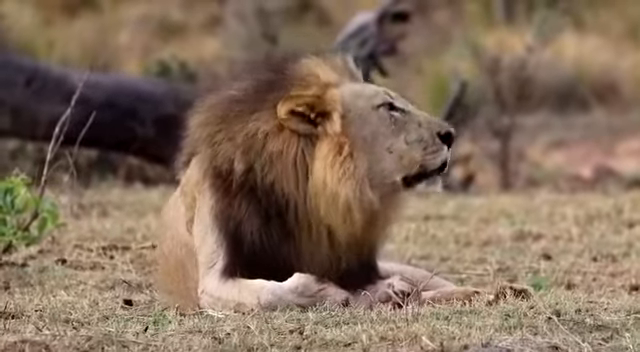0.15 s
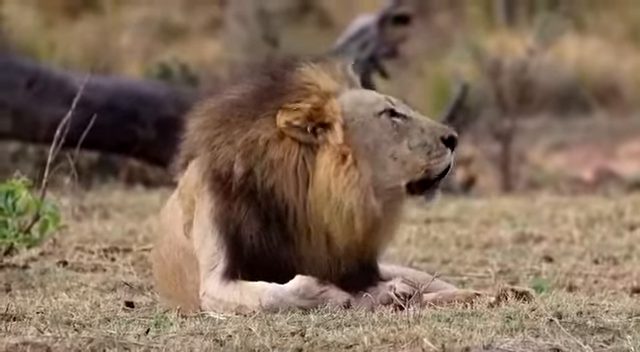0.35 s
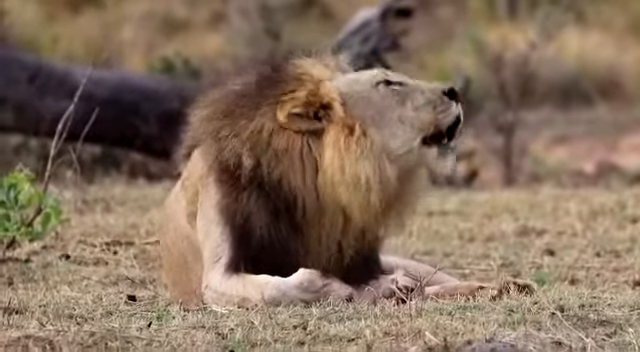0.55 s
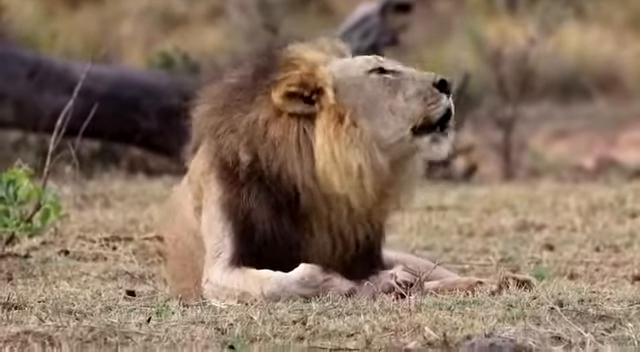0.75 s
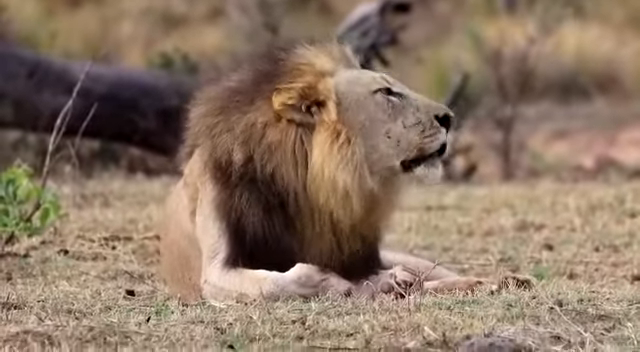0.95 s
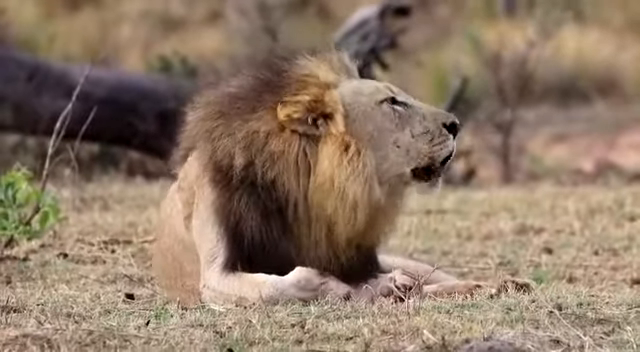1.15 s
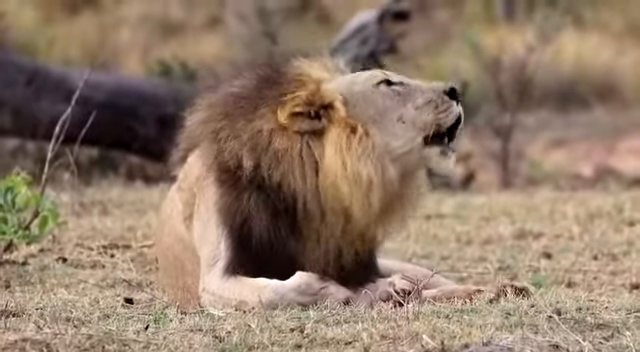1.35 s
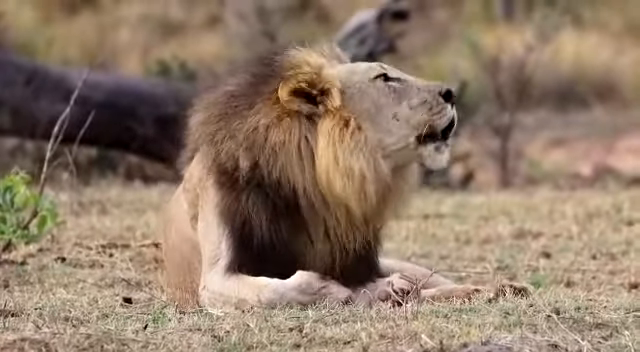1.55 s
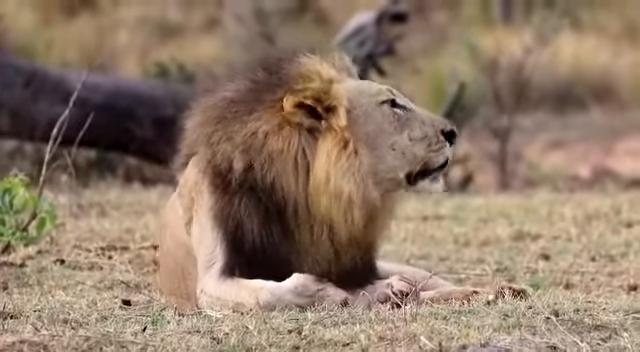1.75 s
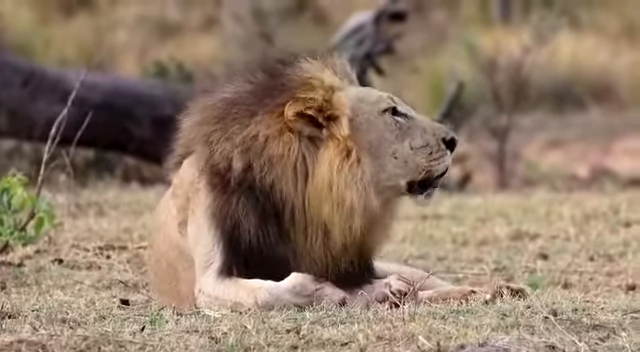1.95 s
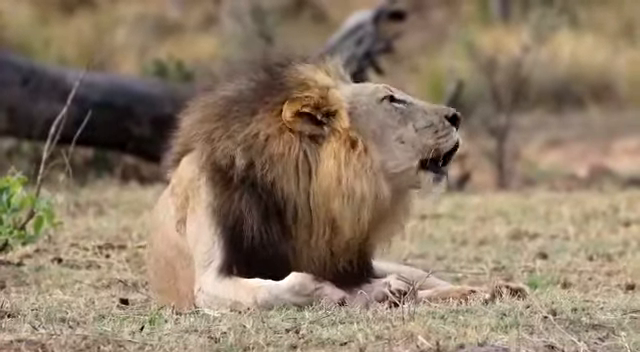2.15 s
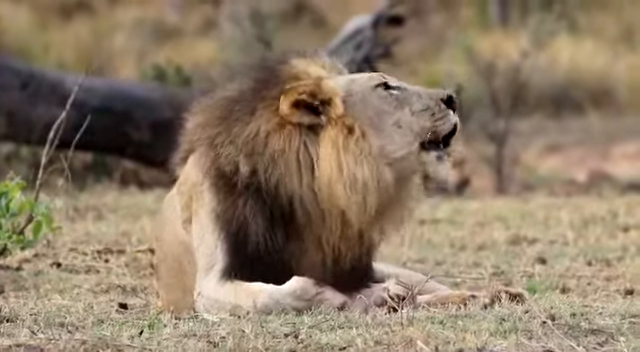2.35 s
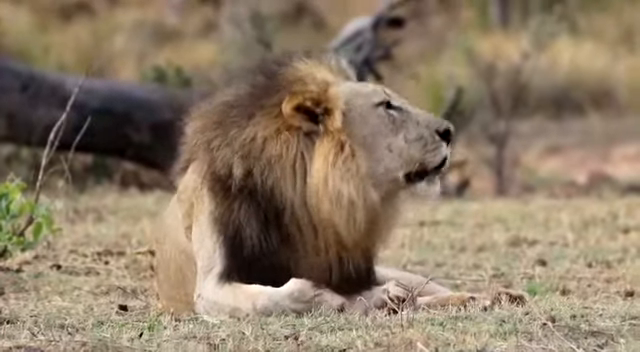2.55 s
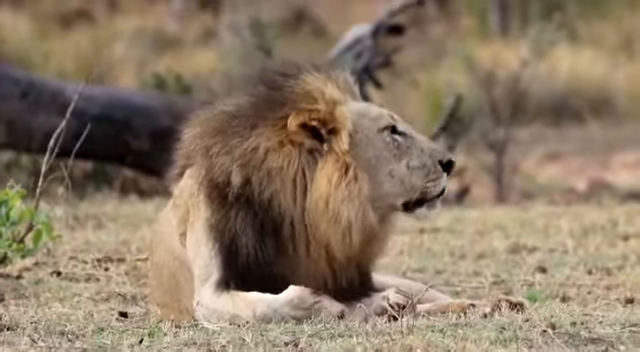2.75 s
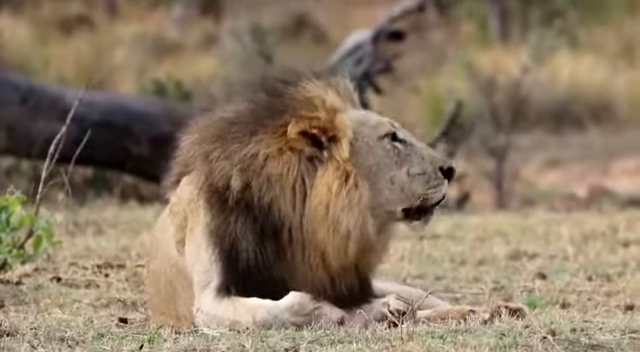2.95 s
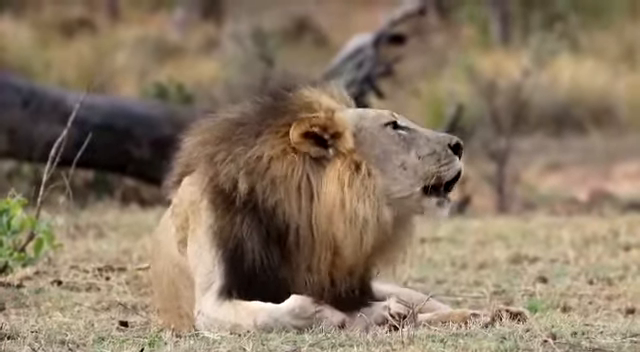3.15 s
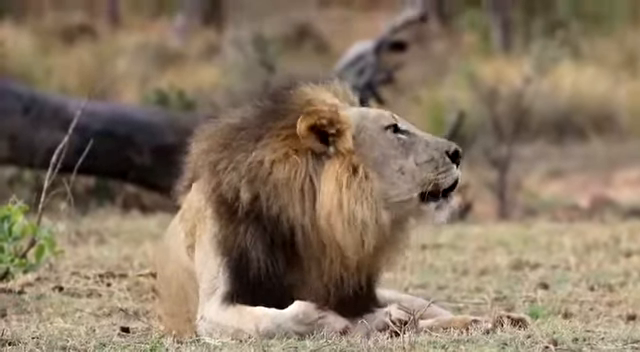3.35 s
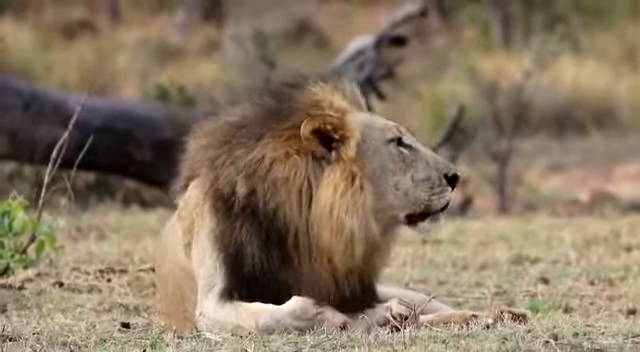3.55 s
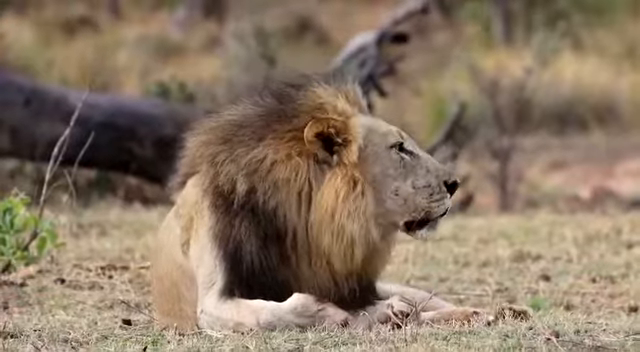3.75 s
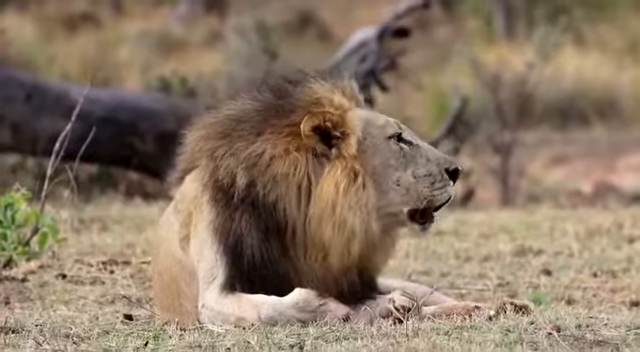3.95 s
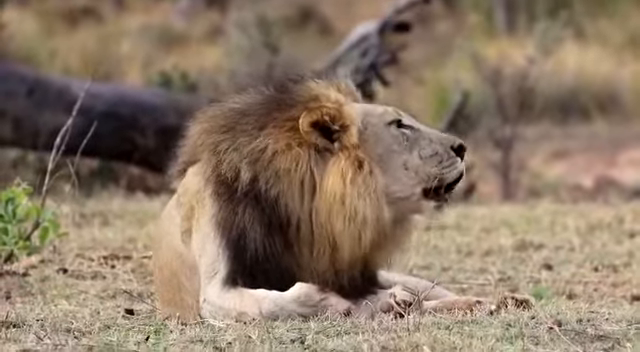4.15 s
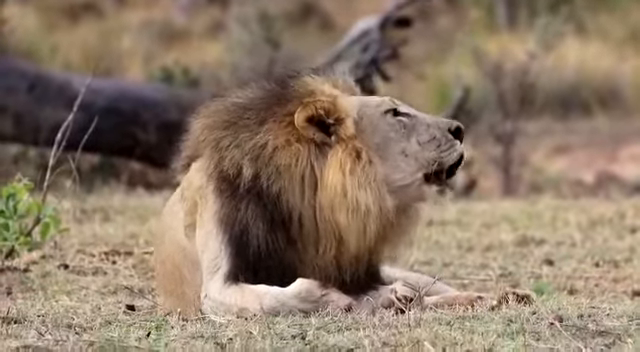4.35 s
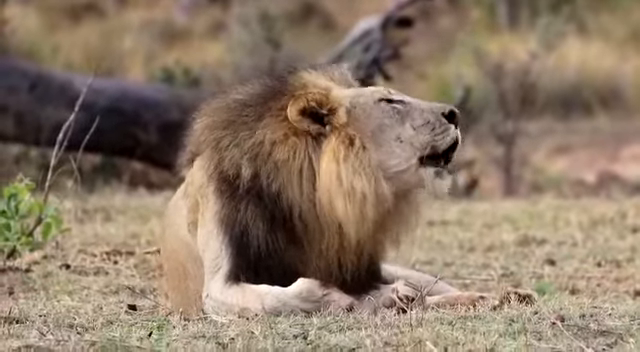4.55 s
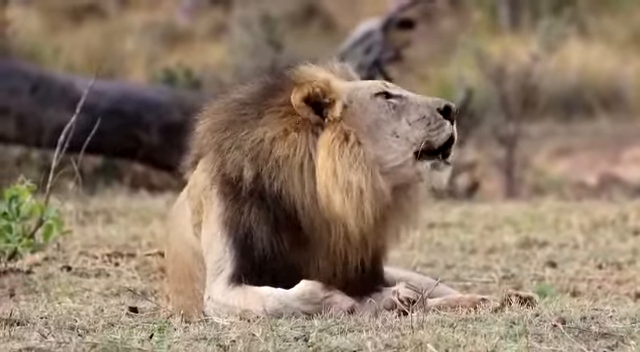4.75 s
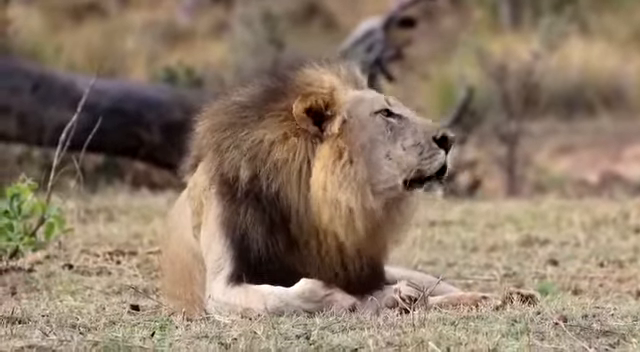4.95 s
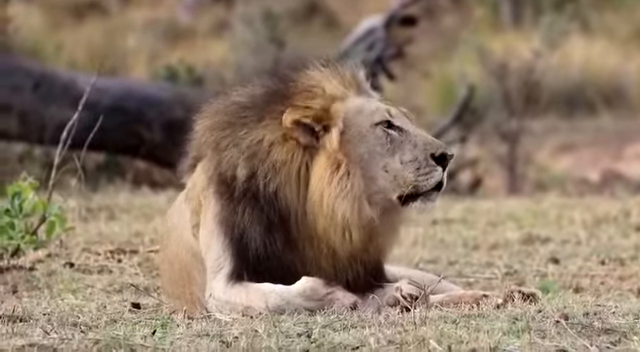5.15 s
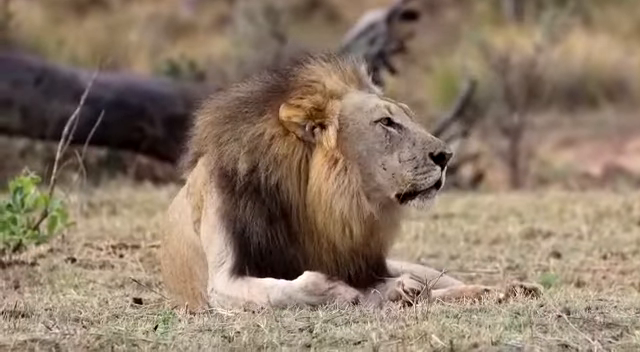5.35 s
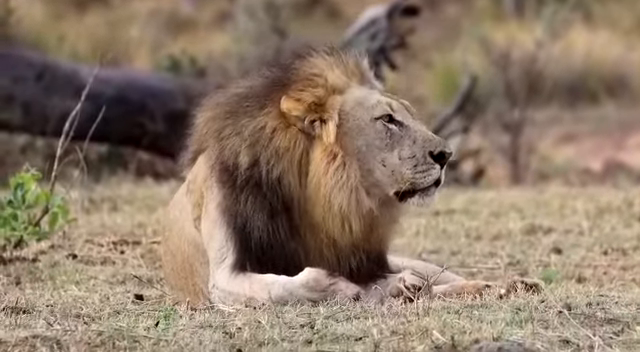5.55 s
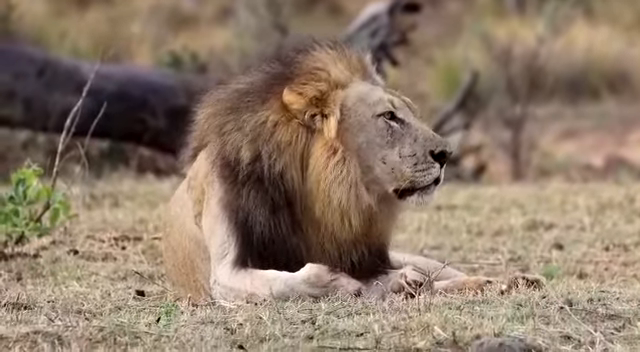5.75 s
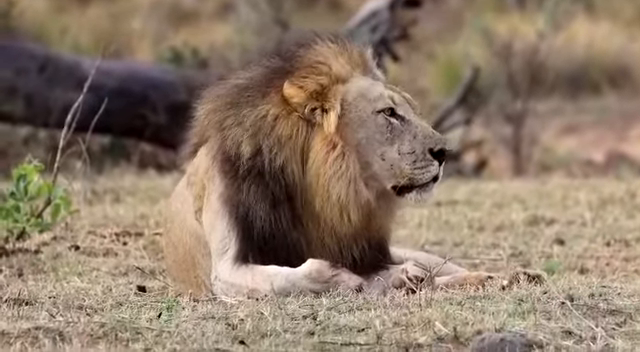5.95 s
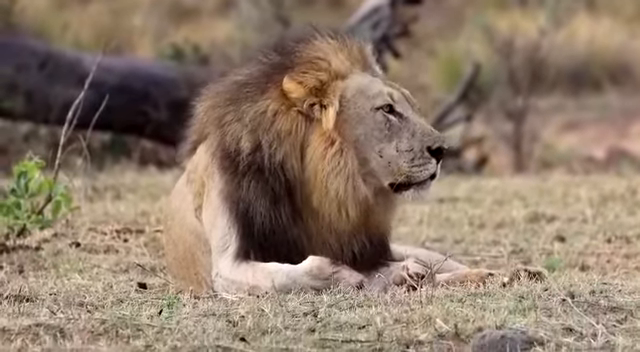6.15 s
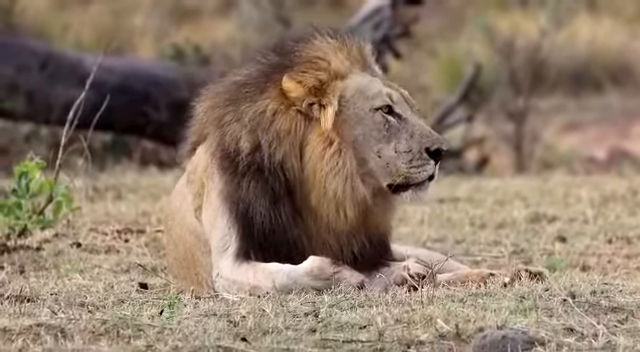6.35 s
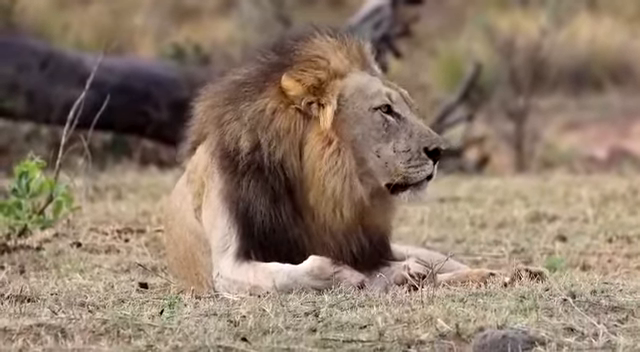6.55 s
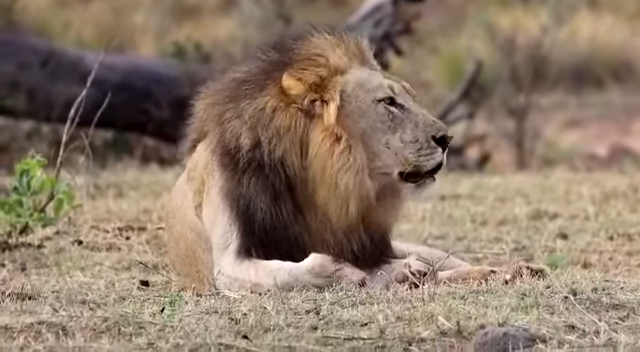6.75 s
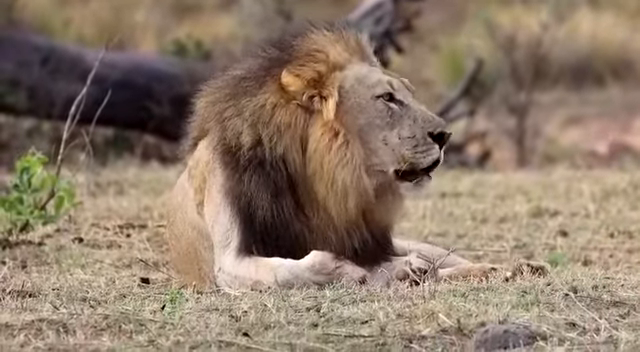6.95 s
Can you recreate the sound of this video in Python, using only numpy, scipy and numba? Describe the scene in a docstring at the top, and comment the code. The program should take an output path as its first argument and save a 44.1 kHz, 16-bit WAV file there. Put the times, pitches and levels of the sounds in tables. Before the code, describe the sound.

A lion's low chest grunts dominate, each a brief burst of booming throat tone with raspy breath, softening from the clear opening one to a chaotic, weak fifth and a stronger sixth. Quiet stereo bush murmur lies underneath. Short nasal squawks recur throughout, quick high chirps cluster in the middle, mostly leaning left, and distant doves coo dimly. The ending is calm: sparse whistles, squawks and tiny dry snaps, with natural open-air echo.

```python
"""Open bush: a lion gives six deep grunts, songbirds whistle, one bird squawks again and again, doves coo far off.
Lion: a sine chest tone, folds ringing throat resonances, and noise breath through the mouth; trees return a low echo.
Birds: whistles and coos are gliding near sines, squawks are clicks through resonances, the dove hum is narrow noise.
Ticks are short noise bursts; the bush murmur is stereo noise shaped in bands."""
import sys
import numpy as np
from scipy import signal
from scipy.io import wavfile
from scipy.ndimage import uniform_filter1d
from numba import njit

SR = 44100
rng = np.random.default_rng(int(sys.argv[2]) if len(sys.argv) > 2 else 0)


def store_wav(level_fs):
    """Save 16-bit WAV to argv[1]."""
    pcm = np.round(np.clip(np.atleast_2d(level_fs), -1, 1) * 32767)
    wavfile.write(sys.argv[1], SR, pcm.T.astype(np.int16))


N = 308259
LEFT_RIGHT = np.array([[1], [-1]])   # signs of a side signal


def from_db(db):
    """Decibels to gain."""
    return 10 ** (np.asarray(db) / 20)


def rms_one(x):
    """Scale to rms 1."""
    return x / np.sqrt(np.mean(x ** 2) + 1e-20)


def in_time(tables):
    """Gate open during the calls, then the columns of all calls, on the sample clock."""
    t_s, *columns = np.transpose(np.concatenate(tables))
    t = np.arange(N) / SR
    is_open = sum((t >= rows[0][0]) & (t < rows[-1][0]) for rows in tables)
    gate = uniform_filter1d(is_open * 1., size=300, mode="nearest")
    return [gate] + [np.interp(t, t_s, column) for column in columns]


def at_hz(points, hz):
    """Read a spectrum table on a log frequency axis."""
    table_hz, values = np.array(points).T
    return np.interp(np.log(hz), np.log(table_hz), values)


def drift(rate):
    """Slow random signal of spread 1; a higher rate moves faster."""
    step = 40   # computed on every 40th sample
    r = np.exp(-2 * np.pi * step * rate / SR)
    settle = 2000
    noise = rng.standard_normal(N // step + settle + 2)
    slow = rms_one(signal.lfilter([1], [1, -2 * r, r * r], noise)[settle:])
    return np.interp(np.arange(N) / step, np.arange(len(slow)), slow)


@njit
def resonate(x, hz, width, rate):
    """Two-pole resonance whose centre may move; gain 1 on top."""
    out = np.zeros(len(x))
    r = np.exp(-np.pi * width / rate)
    for i in range(2, len(x)):
        drive = (1 - r * r) / 2 * (x[i] - x[i - 2])
        turn = 2 * r * np.cos(2 * np.pi * hz[i] / rate)
        out[i] = drive + turn * out[i - 1] - r * r * out[i - 2]
    return out


def modes(x, table, bend=1):
    """Parallel resonances (f/Hz, width/Hz, level/dB), signs alternating; bend scales every f."""
    return sum((-1) ** k * from_db(db) * resonate(x, hz * bend * np.ones(N), width * 1., SR)
               for k, (hz, width, db) in enumerate(table))


def evened(x, span_s):
    """Hold the level near 1 over span_s, so that an envelope can be laid on."""
    power = uniform_filter1d(x ** 2, size=int(span_s * SR))
    return x / np.sqrt(power + 1e-12)


def pulses(cycles, spread_db):
    """One click per cycle, of uneven strength."""
    starts = np.diff(np.floor(cycles), prepend=0) > 0
    return starts * from_db(spread_db * rng.standard_normal(N)) + 1e-18


def pan(x, lean_db):
    """Set left minus right level; positive leans left."""
    return x * from_db(lean_db / 2 * LEFT_RIGHT)


def trees(x, t60_s, rise_s, cut_hz):
    """Scattered reflections: a dying, low-passed noise response, partly common to both sides."""
    t = np.arange(int(t60_s * SR)) / SR
    common, own = rng.standard_normal((2, 2 * SR))[:, :len(t)]
    shape = rms_one(from_db(-60 * t / t60_s) * np.clip(t / rise_s, 0, 1))
    scatter = shape * (common + .5 * own * LEFT_RIGHT)
    response = signal.lfilter(*signal.butter(1, cut_hz, fs=SR), scatter)
    return signal.fftconvolve(x[None], response / np.sqrt(len(t)), axes=1)[:, :N]


def mouth_noise(puffs, jaw):
    """Puffed noise through the mouth resonances, in three groups that flicker independently; rms 1."""
    # breath resonances: f/Hz, width/Hz, level/dB
    mouth = [(677, 140, -9), (909, 74, -1), (1280, 160, -2), (2077, 138, 2), (2806, 220, -6),
             (3230, 71, -1.5), (3975, 155, -1.5), (5050, 680, -7.5), (6210, 87, -21), (7020, 140, -14.5),
             (12850, 1000, -29.5)]
    total = 0
    for k in range(3):
        flicker = from_db(4.97 * drift(9.8))
        total = total + flicker * modes(puffs * rng.standard_normal(N), mouth[k::3], jaw)
    return rms_one(total)


def lion():
    """Vocal folds drive a chest tone and throat rings; breath rasps through the mouth in uneven puffs."""
    # one curve per grunt: t/s, chest level/dB, pitch f/Hz, throat ring level/dB, throat f/Hz, breath level/dB
    grunts = [
        [(0.0, -7, 131.1, -5, 370, -19), (0.016, -13, 128, -21, 363, -31),
         (0.038, -12.5, 117.2, -25.5, 363, -35.5), (0.074, -30, 113.8, -37.5, 338, -43.5),
         (0.096, -25, 124, -27.5, 325, -37.5), (0.134, -29, 127.6, -38, 336, -41),
         (0.158, -30, 127.3, -65, 354, -62), (0.25, -44.5, 121, -67, 348, -65)],
        [(0.7, -47, 114.2, -71, 313.6, -76), (0.762, -26, 116.3, -36.5, 335.4, -43.5),
         (0.804, -25, 117.1, -37.5, 355, -44), (0.824, -19, 117, -19.5, 354, -36),
         (0.848, -9.5, 117.9, -17, 380, -29), (0.872, -14, 115.5, -26, 353.7, -38.5),
         (0.908, -31.5, 115, -44, 345, -45.5), (0.93, -40, 113.4, -32.5, 320, -41.5),
         (0.972, -33.5, 109, -40, 332, -53), (1.05, -72, 111.9, -67, 336, -66)],
        [(1.5, -59, 111.5, -79, 333.5, -74), (1.536, -41, 112, -51, 335.9, -64),
         (1.554, -29.5, 111.5, -45, 350, -50), (1.61, -24.5, 111, -34, 349, -43),
         (1.636, -17.5, 111.7, -21, 336, -34), (1.66, -14.5, 112.5, -25.5, 345.6, -35.5),
         (1.702, -34.5, 111.5, -36, 360, -49.5), (1.756, -35, 111.2, -51, 343, -48.5),
         (1.774, -31, 110.5, -49, 337, -51), (1.85, -54, 111.4, -66, 334, -92)],
        [(2.37, -57.5, 114.7, -73, 326, -68), (2.404, -42, 115.8, -55, 351.8, -70.5),
         (2.456, -28, 114.4, -31.5, 357, -44), (2.486, -19.5, 115.1, -33, 356, -42),
         (2.522, -20.5, 110.6, -32, 360, -38), (2.558, -19.5, 110.1, -21.5, 332.5, -36.5),
         (2.582, -25, 107.8, -34, 322, -39), (2.632, -50, 109, -39.5, 337, -53),
         (2.668, -39, 110, -46.5, 310, -55), (2.75, -44, 110, -59, 331, -65)],
        [(3.32, -47, 114.8, -63, 336, -67), (3.344, -44, 109.5, -47, 338, -70),
         (3.37, -29, 104.5, -46, 347, -53.5), (3.392, -28, 104.6, -33, 344, -52),
         (3.432, -43, 104.5, -38, 328, -59), (3.46, -24, 104.5, -26.5, 338, -38),
         (3.526, -38, 122, -43, 340, -54.5), (3.57, -46, 111.5, -53, 320, -56),
         (3.602, -42.5, 114.1, -51, 345, -56), (3.65, -64, 119.4, -68, 345, -64)],
        [(4.62, -81, 116, -97, 319, -57), (4.648, -40, 116, -52, 348, -58),
         (4.712, -32, 103.7, -34.5, 347.5, -45.5), (4.74, -28.5, 104.6, -29.5, 331.4, -43),
         (4.77, -17.5, 111.8, -24, 339.2, -36.5), (4.802, -17.5, 112.6, -32.5, 334, -46),
         (4.848, -19.5, 112, -19.5, 334.8, -35), (4.986, -36.5, 112.2, -37.5, 331, -46),
         (5.052, -41, 117, -45, 319.5, -58.5), (5.1, -52, 119.4, -52, 320, -50)],
    ]
    # per grunt at full effort: roughness, 0 clear to 1 chaotic
    roughness = [.1, .12, .35, .55, .9, .65]
    # weaker throat resonances: f/Hz, width/Hz, level/dB
    throat_fill = [(190, 22.3, 7), (256, 97, -4.5), (445.5, 110, -8), (507, 19.5, -5)]
    # hard rasps in the breath: t/s, approximate peak level/dB
    rasps = [(0.0923, -22), (0.7546, -32), (0.829, -45), (0.8667, -10), (0.938, -41), (0.9524, -39),
             (1.5535, -39), (1.6123, -35), (1.652, -16), (1.76, -34), (2.492, -28), (2.5115, -26),
             (2.5514, -38), (2.5746, -30), (2.6194, -37), (3.4544, -19.5), (3.4891, -42), (4.7158, -40),
             (4.7535, -18.5), (4.769, -16.5), (4.7844, -42.5), (4.8322, -19), (4.8528, -27), (4.8868, -21),
             (4.9083, -12), (4.9325, -29.5), (4.9863, -19)]

    gate, chest_db, pitch_hz, ring_db, throat_hz, breath_db = in_time(grunts)
    starts_s = [rows[0][0] for rows in grunts]
    grunt = np.searchsorted(starts_s, np.arange(N) / SR, side="right") - 1
    # the folds only lock into a steady beat at full effort
    slackness = np.clip(-17 - chest_db, 0, 99) / 14
    rough = np.clip(np.array(roughness)[grunt] + slackness, 0, 1)

    cycles = np.cumsum(pitch_hz * (1 + .05 * rough * drift(30))) / SR
    chest_gain = from_db(chest_db + 5.0 * rough * drift(46.0))
    chest = np.sqrt(2) * np.sin(2 * np.pi * cycles) * chest_gain
    # the body radiates no deeper
    chest = signal.sosfilt(signal.butter(2, 85, "high", fs=SR, output="sos"), chest)

    # slack tissue flaps at its own slow, uneven rate
    flap_hz = 45
    flap_cycles = np.cumsum(flap_hz * from_db(4 * drift(30.64))) / SR
    flaps = pulses(flap_cycles, 3.0) * np.sqrt(SR / flap_hz)
    steady = pulses(cycles, 4.2) * np.sqrt(SR / pitch_hz)
    chaotic = .8 * flaps + .7 * rng.standard_normal(N)
    folds = (1 - rough) * steady + rough * chaotic

    ring = resonate(folds, throat_hz, 60.6, SR)
    ring = evened(resonate(ring, throat_hz, 99.0, SR), 0.03)
    # dark below and above the throat
    band = signal.butter(2, [150, 600], "band", fs=SR, output="sos")
    fill = signal.sosfilt(band, modes(folds, throat_fill, 1 + 0.062 * drift(12.6)))
    throat = from_db(ring_db) * (ring + from_db(-4.5) * evened(fill, 0.24))
    voice = gate * (chest + throat)
    # the throat beams a little to the right; shifts in samples
    chest_side = .02 * chest + .05 * np.roll(chest, shift=95)
    throat_side = -.08 * throat + .08 * np.roll(throat, shift=30)
    voice_side = gate * (chest_side + throat_side)

    puff_decay = np.exp(-1 / (.006 * SR))
    puffs = .5 + .35 * rms_one(signal.lfilter([1], [1, -puff_decay], flaps))
    jaw = 1 + .03 * drift(6)   # the mouth never holds still
    mid = mouth_noise(puffs, jaw)
    side = mouth_noise(puffs, jaw)
    breath = gate * from_db(breath_db) * (.88 * mid + .45 * side * LEFT_RIGHT)

    # a rasp is a sharp-fronted gust through the same mouth
    kicks = np.zeros(N)
    kicks[[int(s * SR) for s, _ in rasps]] = from_db(np.array(rasps)[:, 1])
    gust_decay = np.exp(-1 / (0.013 * SR))
    gusts = signal.lfilter([1], [1, -gust_decay], kicks + 1e-18)
    # low factors: noise peaks far above its rms
    breath = breath + gusts * (0.11 * mid + .05 * side * LEFT_RIGHT)

    voice_echo = from_db(-20) * trees(voice, t60_s=1.9, rise_s=.08, cut_hz=260)
    breath_echo = from_db(-4.5) * trees(breath[0], t60_s=0.39, rise_s=.02, cut_hz=1600)
    return voice + voice_side * LEFT_RIGHT + pan(breath, -1.4) + voice_echo + breath_echo


def air():
    """Far bush murmur: 0.4-octave bands of stereo noise, each flickering a little."""
    # murmur spectrum: f/Hz, relative level/dB per Hz
    spectrum = [(24, -44), (40, -7), (123, 5), (260, -6.5), (522, -5), (577, -6.5), (621, -12), (722, -7),
                (973, -7), (1380, -8), (2010, -5.5), (3220, -12.5), (12100, -27.5), (14000, -26.5),
                (15500, -51)]
    # left-right likeness: f/Hz, correlation
    likeness = [(60, 0.79), (130, 0.97), (500, 0.38), (1400, -0.18), (3100, -0.34), (15000, 0.063)]
    level_db = -52.5
    out = 0
    together = drift(1.5)
    edges_hz = 35 * 2 ** np.arange(0, 9, .4)
    white = rng.standard_normal((2, 2, N))   # two mid-side pairs, used by alternate bands
    for k, (low, high) in enumerate(zip(edges_hz, edges_hz[1:])):
        band = signal.butter(2, [low, high], "band", fs=SR, output="sos")
        mid, side = signal.sosfilt(band, white[k % 2])
        centre_hz = np.sqrt(low * high)
        alike = np.clip(at_hz(likeness, centre_hz), -1, 1)
        gain = from_db(at_hz(spectrum, centre_hz) + .7 * together + 1.2 * drift(4))
        out = out + gain * (np.sqrt(1 + alike) * mid + np.sqrt(1 - alike) * side * LEFT_RIGHT)
    return pan(from_db(level_db) * rms_one(out), -1.6)


def far_doves():
    """A distant chorus melts into a narrow throbbing hum: noise through two resonances."""
    hum = modes(rng.standard_normal(N), [(644, 15, 0)])
    hum = modes(hum, [(610, 51, 0)])
    return pan(rms_one(hum) * from_db(-68 + 4.7 * drift(4)), -0.82)


def ticks():
    """Short dry snaps in the grass: decaying noise bursts, band-passed around the ring pitch."""
    # ticks: t/s, peak level/dB, ring f/Hz, left minus right level/dB
    snaps = [(.418, -38.5, 4842, 1), (1.202, -49, 10160, -1), (2.249, -51, 7900, -27),
             (5.511, -43, 9530, -13), (5.53, -45, 9370, 3), (5.826, -36.5, 682, -1),
             (6.204, -41.5, 8500, -12), (6.217, -40.5, 6370, -7), (6.451, -40, 2170, -9),
             (6.93, -53, 9200, 3)]
    length = 800   # samples
    out = np.zeros((2, N))
    t = np.arange(length) / SR
    for (start_s, peak_db, hz, lean_db), noise in zip(snaps, rng.standard_normal((len(snaps), length))):
        edges_hz = [hz * .7, min(hz * 1.45, .45 * SR)]
        burst = noise * np.exp(-t / (0.0012 + 2.5 / hz))
        snap = signal.sosfilt(signal.butter(2, edges_hz, "band", fs=SR, output="sos"), burst)
        at = int(start_s * SR)
        out[:, at:at + length] += pan(from_db(peak_db) * snap / np.abs(snap).max(), lean_db)
    return out


def squawker():
    """Uneven clicks at about 200 a second ring a falling resonance and fixed ones around it."""
    # squawks: start t/s, mid t/s, end t/s, onset level/dB, mid level/dB,
    # main resonance f/Hz at the start, share it sags linearly, hiss level/dB over the call
    squawks = [(.488, .542, .61, -53, -39.5, 1930, .12, -18), (1.157, 1.19, 1.25, -44, -38, 1900, .3, -30),
               (1.872, 1.94, 1.99, -43, -46, 2000, .3, -8),
               (2.118, 2.163, 2.24, -53, -37.5, 2020, .14, -28),
               (3.745, 3.81, 3.86, -48, -41, 2000, .12, -18), (4.232, 4.28, 4.34, -45, -43, 2020, .32, -10),
               (4.474, 4.484, 4.55, -40, -35, 1750, .22, -18),
               (5.432, 5.465, 5.53, -42, -37, 1800, .12, -30),
               (6.057, 6.103, 6.16, -46, -36, 1950, .1, -28),
               (6.312, 6.362, 6.425, -51, -35, 2120, .13, -8)]
    end_db = -26   # end relative to mid
    calls = []
    for s0, s1, s2, onset_db, db, hz, sag, hiss in squawks:
        mid_hz = hz * (1 - sag * (s1 - s0) / (s2 - s0))
        calls.append([(s0, onset_db, hz, hiss), (s1, db, mid_hz, hiss),
                      (s2, db + end_db, hz * (1 - sag), hiss)])
    gate, level_db, centre_hz, hiss_db = in_time(calls)
    ends_s = np.array([(rows[0][0], rows[-1][0]) for rows in calls])
    progress = np.interp(np.arange(N) / SR, ends_s.ravel(), np.tile([0, 1], len(ends_s)))
    centre_hz = centre_hz * (1 - .33 * progress ** 3.5)   # the beak closes towards the end

    cycles = np.cumsum(200 * (1 + .18 * drift(60))) / SR
    clicks = pulses(cycles, 3) + .025 * rng.standard_normal(N)
    main = resonate(resonate(clicks, centre_hz, 150., SR), centre_hz, 700., SR)
    body = main + modes(clicks, [(1200, 450, -12), (2780, 200, -13)])
    # the clicks are soft
    body = signal.sosfilt(signal.butter(5, 3300, fs=SR, output="sos"), body)
    hiss_source = clicks + 0.52 * rng.standard_normal(N)
    hiss = modes(hiss_source, [(3680, 510, 7.5), (5719, 1835, -3.0), (6500, 640, 1.0)])
    hiss = signal.sosfilt(signal.butter(4, [3000, 8000], "band", fs=SR, output="sos"), hiss)
    mix = evened(body, 0.028) + from_db(hiss_db) * evened(hiss, 0.0074)
    call = gate * from_db(level_db) * mix
    return pan(call, -1.5) + from_db(-10) * trees(call, t60_s=.3, rise_s=.008, cut_hz=4000)


def bird_notes():
    """Every tonal note as left minus right level/dB and a glide of (t/s, f/Hz, level/dB)."""
    # dove coos: start t/s, length t/s, pitch f/Hz, peak level/dB
    coos = [(1.161, 0.19, 573, -60.5), (1.927, 0.16, 564, -58), (2.247, 0.11, 544, -58.5),
            (2.785, 0.11, 543, -60.5), (3.052, 0.074, 539, -61), (3.22, 0.19, 559, -63),
            (6.492, 0.057, 603, -51.5)]
    # thin falling peeps of one far bird: start t/s, level/dB
    peeps = [(2.699, -67), (2.932, -79), (3.775, -73), (3.849, -65.5), (5.135, -75), (5.43, -70),
             (5.575, -74), (5.8, -70.5), (6.019, -68.5)]
    # whistles, loudest where the glide bends: start t/s, bend t/s, end t/s,
    # start f/Hz, bend f/Hz, end f/Hz, peak level/dB, left minus right level/dB
    whistles = [ (1.005, 1.033, 1.05, 2940, 2790, 2770, -58, -9.5),
                (1.165, 1.239, 1.29, 2533, 2325, 1760, -50.5, -20),
                (2.67, 2.675, 2.685, 3660, 5100, 5330, -56, -11),
                (2.683, 2.687, 2.697, 3950, 4300, 5100, -55, -3),
                (2.69, 2.705, 2.74, 3880, 5160, 6210, -59.5, -1),
                (2.745, 2.754, 2.77, 6980, 8100, 9600, -66, -18),
                (2.746, 2.765, 2.79, 3400, 4800, 5270, -52.5, -6),
                (2.89, 2.926, 2.97, 2860, 3030, 2926, -52.5, -1),
                (2.997, 3.115, 3.12, 4260, 3800, 3540, -64.5, 4),
                (3.199, 3.217, 3.22, 2500, 4110, 4780, -53, 6),
                (3.214, 3.221, 3.225, 3140, 4270, 4630, -56.5, 4),
                (3.225, 3.235, 3.245, 5060, 3800, 3150, -59, -13.5),
                (3.421, 3.466, 3.475, 6830, 8140, 8650, -49.5, -8),
                (3.623, 3.64, 3.68, 3830, 5400, 3730, -48.5, -4),
                (3.631, 3.643, 3.68, 3460, 4570, 2760, -60, -31),
                (3.604, 3.65, 3.66, 6150, 9550, 6460, -69.5, -24),
                (3.679, 3.68, 3.7, 5330, 5760, 7060, -60.5, -12),
                (3.873, 3.879, 3.96, 3860, 3780, 3330, -64, -2),
                (4.112, 4.123, 4.145, 3460, 5070, 6270, -53.5, 6),
                (4.118, 4.132, 4.145, 6140, 6800, 8150, -62.5, -12),
                (4.126, 4.166, 4.18, 3330, 5320, 6580, -49.5, -6),
                (4.191, 4.202, 4.212, 7660, 3910, 6270, -45.5, -10),
                (4.286, 4.293, 4.293, 3020, 4700, 5400, -47, -12),
                (4.363, 4.37, 4.385, 3140, 4000, 4620, -61, -7),
                (4.52, 4.53, 4.56, 4270, 3840, 3800, -59, -3),
                (4.559, 4.572, 4.575, 4470, 4630, 4700, -52, -1),
                (4.574, 4.582, 4.6, 3420, 4200, 3320, -46.5, 5),
                (4.606, 4.624, 4.635, 3100, 3660, 3596, -50.5, -4),
                (5.379, 5.414, 5.42, 1776, 1867, 1860, -53, -18),
                (5.462, 5.483, 5.497, 2040, 2330, 2330, -48.5, -18),
                (5.449, 5.47, 5.49, 2880, 2770, 2740, -69, -14),
                (5.606, 5.629, 5.634, 1463, 1665, 2510, -57, -15),
                (5.635, 5.637, 5.654, 2480, 2510, 2353, -49, -18),
                (5.793, 5.809, 5.84, 2227, 1963, 1495, -52.5, -14),
                (5.839, 5.872, 5.9, 1413, 1328, 1400, -59.5, -8),
                (5.93, 5.969, 5.97, 3190, 3046, 3020, -65.5, -9),
                (6.866, 6.89, 6.92, 3550, 3590, 3250, -70, -5),
                (6.721, 6.742, 6.76, 2410, 2810, 2777, -56.5, -7),
                (6.734, 6.8, 6.96, 4720, 4580, 3640, -71, -13), ]
    # longer warbles: left minus right level/dB, then rows of t/s, pitch f/Hz, level/dB
    warbles = [ (-10, [(3.03, 6690, -57), (3.045, 7470, -52), (3.06, 6470, -73), (3.09, 5700, -55.5),
               (3.11, 4460, -44.5), (3.13, 3820, -52), (3.16, 3030, -59.5)]), (6, [(3.265, 3420, -63),
               (3.28, 4580, -52), (3.315, 4635, -49.5), (3.345, 4380, -45.5), (3.365, 4140, -53)]),
               (-15, [(3.49, 8500, -49), (3.5, 6030, -62), (3.515, 5140, -50), (3.54, 5220, -46.5),
               (3.58, 5700, -58)]), (-2, [(3.85, 3590, -55), (3.89, 3220, -69), (3.91, 3120, -56.5),
               (3.98, 2974, -56), (4.06, 2690, -62)]), (-10, [(4.333, 8440, -57), (4.36, 6250, -57),
               (4.38, 5800, -64.5), (4.43, 5240, -56.5), (4.46, 5050, -42.5), (4.49, 4770, -64)]),
               (-17.5, [(5.06, 1465, -57), (5.075, 1355, -57), (5.1, 2135, -54.5), (5.12, 2380, -46),
               (5.14, 2860, -59.5), (5.21, 2900, -68)]), (-18.5, [(5.975, 2596, -52.5), (6.02, 2104, -50.5),
               (6.06, 2860, -56.5), (6.085, 2560, -60), (6.105, 2800, -67)]), ]
    # starts and ends relative to the peak
    coo_edge_db, whistle_onset_db, whistle_end_db = -4, -6.5, -9
    peep_s, peep_top_hz, peep_end_hz, peep_lean_db = 0.037, 7700, 6540, -8

    notes = []
    for s, length_s, hz, db in coos:
        edge_db = db + coo_edge_db
        notes.append((0, [(s, hz, edge_db), (s + length_s / 2, hz, db), (s + length_s, hz, edge_db)]))
    for s, db in peeps:
        notes.append((peep_lean_db, [(s, peep_top_hz, db), (s + peep_s, peep_end_hz, db)]))
    for s0, s1, s2, hz0, hz1, hz2, db, lean_db in whistles:
        notes.append((lean_db, [(s0, hz0, db + whistle_onset_db), (s1, hz1, db),
                                (s2, hz2, db + whistle_end_db)]))
    return notes + warbles


def songbirds():
    """Whistles, peeps, warbles and coos: near sines on smooth glides, with a short reflection."""
    out = np.zeros((2, N))
    waver = drift(120)
    fade_s = 0.00043
    for lean_db, rows in bird_notes():
        t_s, hz, level_db = np.transpose(rows)
        at = np.arange(int(t_s[0] * SR), min(int(t_s[-1] * SR), N))
        glide_hz = uniform_filter1d(np.interp(at / SR, t_s, hz), size=200, mode="nearest")
        fade = np.clip(np.minimum(at - at[0], at[-1] - at) / (fade_s * SR), 0, 1)
        tone = np.sqrt(2) * np.sin(2 * np.pi * np.cumsum(glide_hz) / SR) * fade
        gain = from_db(np.interp(at / SR, t_s, level_db) + 2.28 * waver[at])
        out[:, at] += pan(tone * gain, lean_db)
    return out + from_db(-7.5) * trees(out.mean(axis=0), t60_s=0.2, rise_s=0.0033, cut_hz=18000)


def scene():
    """Lion, air, birds and grass, summed."""
    return lion() + air() + far_doves() + ticks() + squawker() + songbirds()


def record(dry):
    """The microphone drops the deep bass; a steep low-pass cuts the top."""
    thinned = signal.sosfilt(signal.butter(2, 55, "high", fs=SR, output="sos"), dry)
    cutoff_hz = 15750   # stopband edge, 70 dB down
    return signal.sosfilt(signal.cheby2(12, 70, cutoff_hz, fs=SR, output="sos"), thinned)


dry = scene()
out = record(dry)
store_wav(out)
```